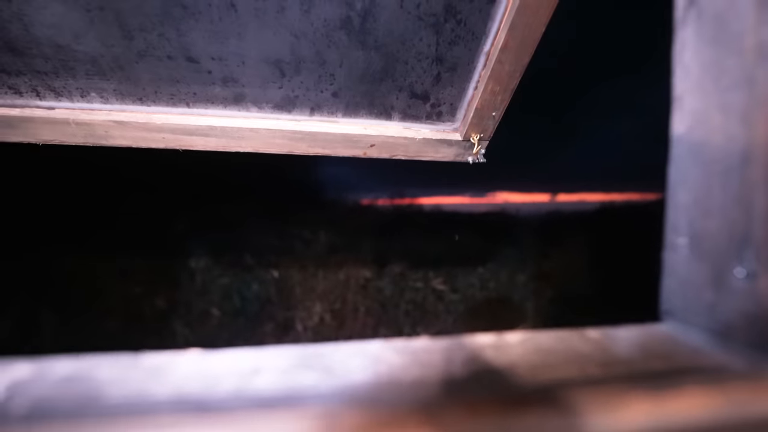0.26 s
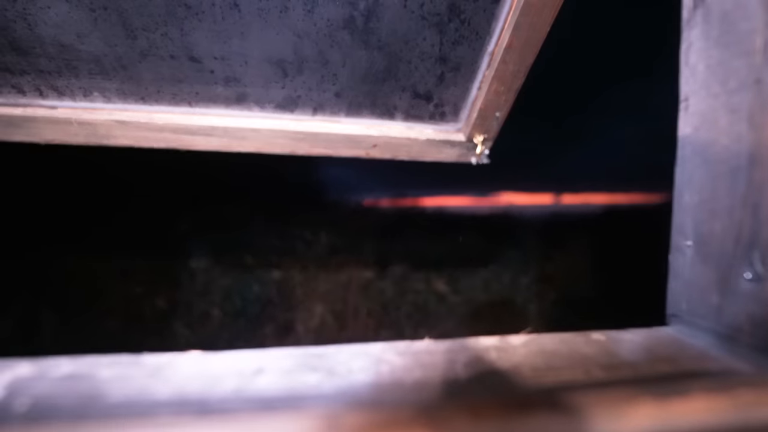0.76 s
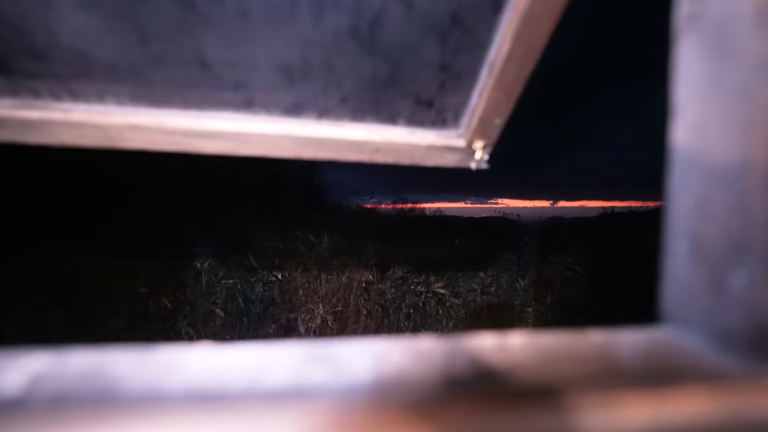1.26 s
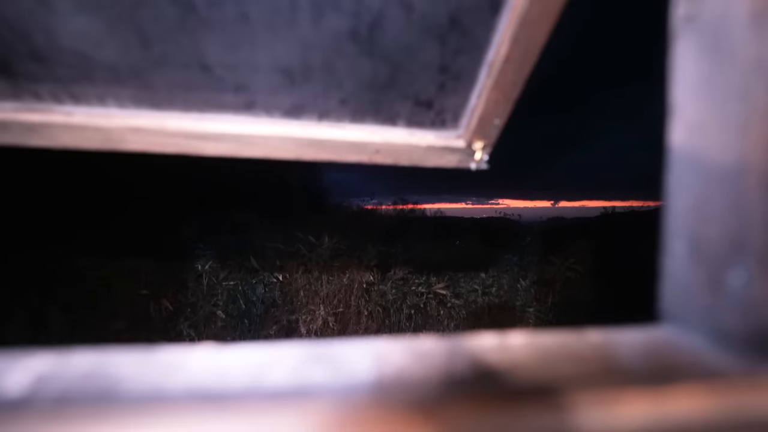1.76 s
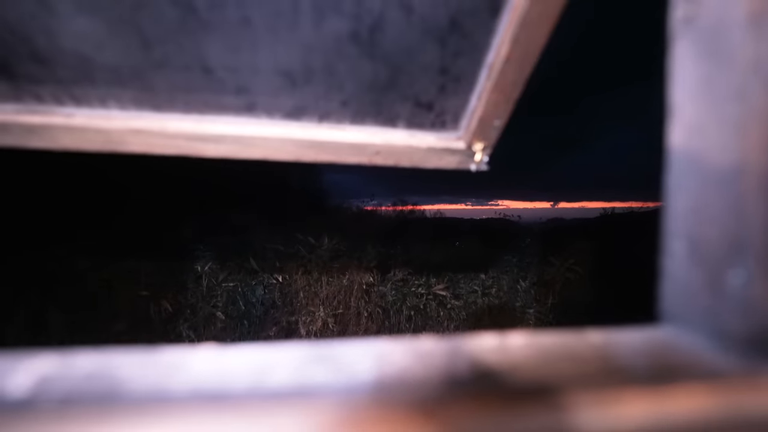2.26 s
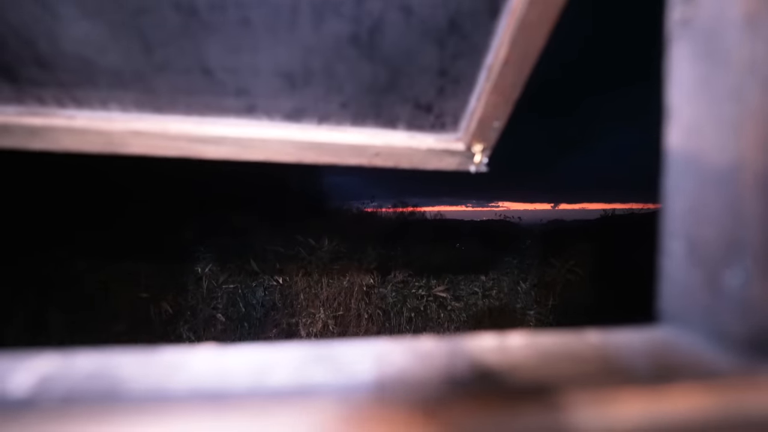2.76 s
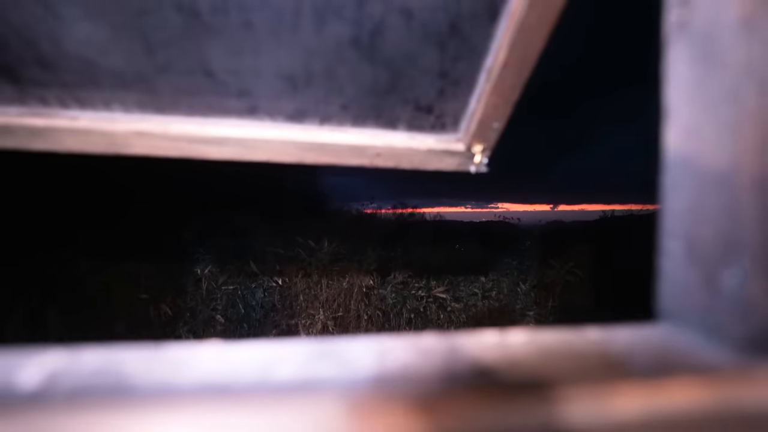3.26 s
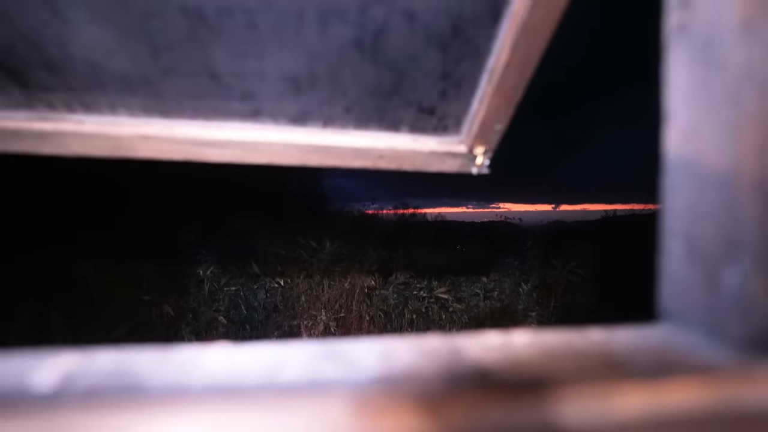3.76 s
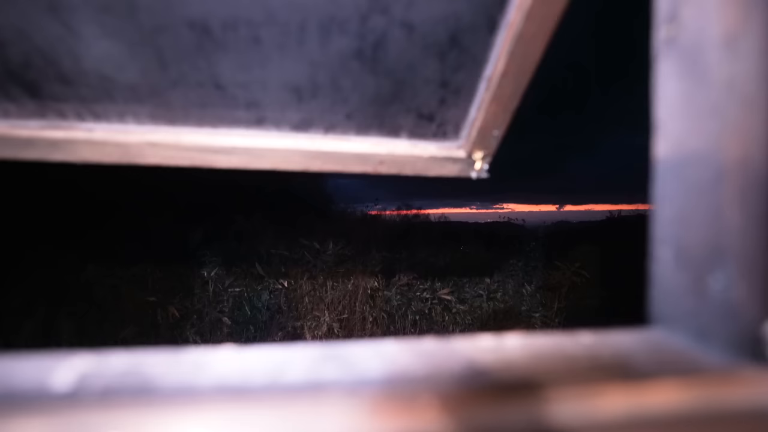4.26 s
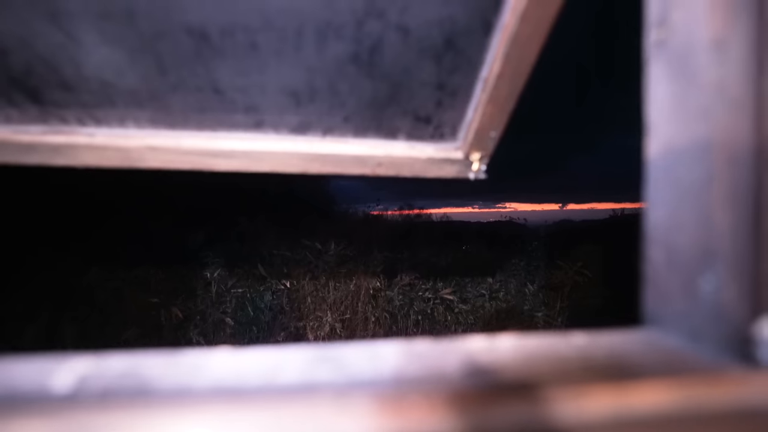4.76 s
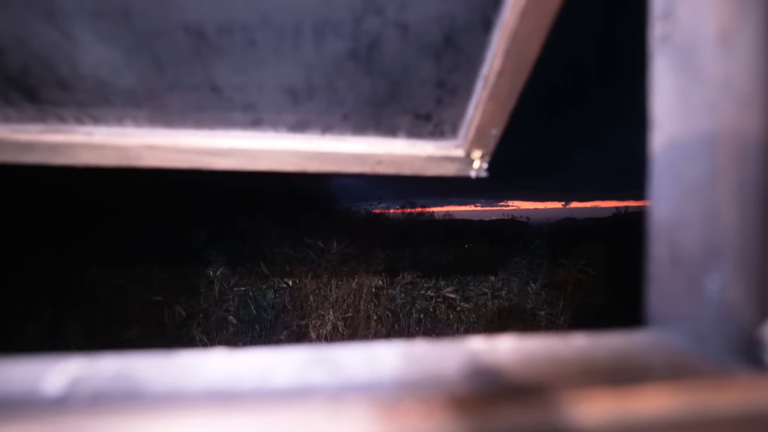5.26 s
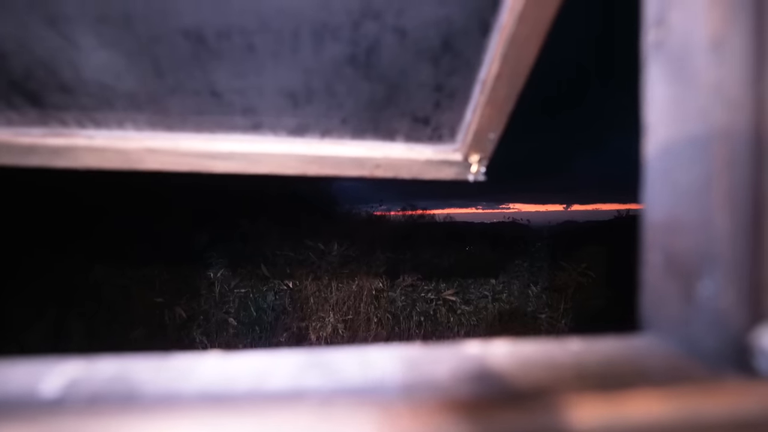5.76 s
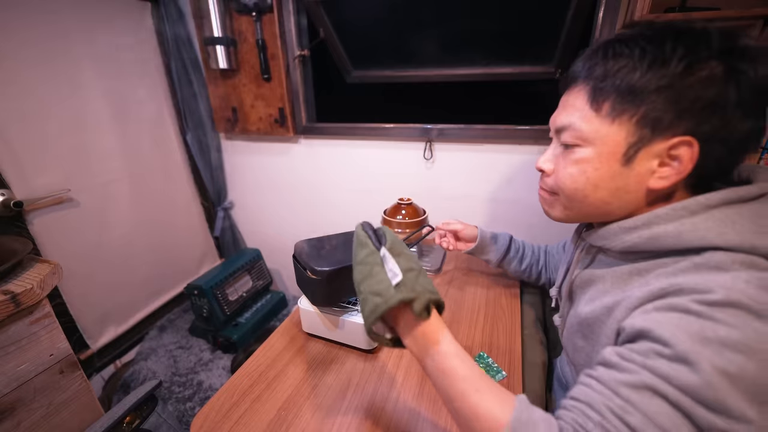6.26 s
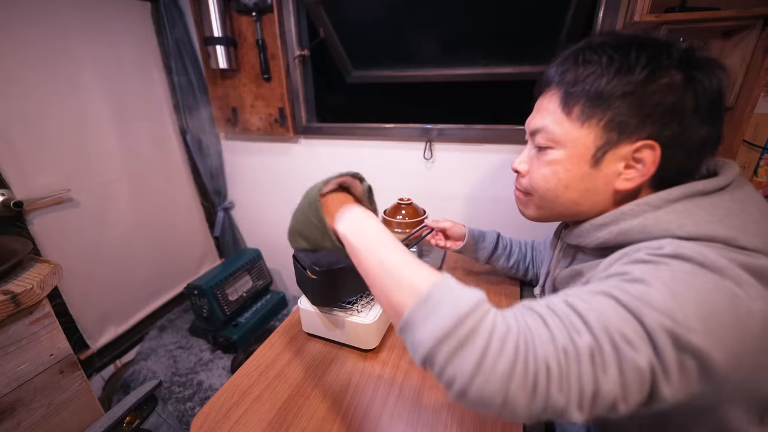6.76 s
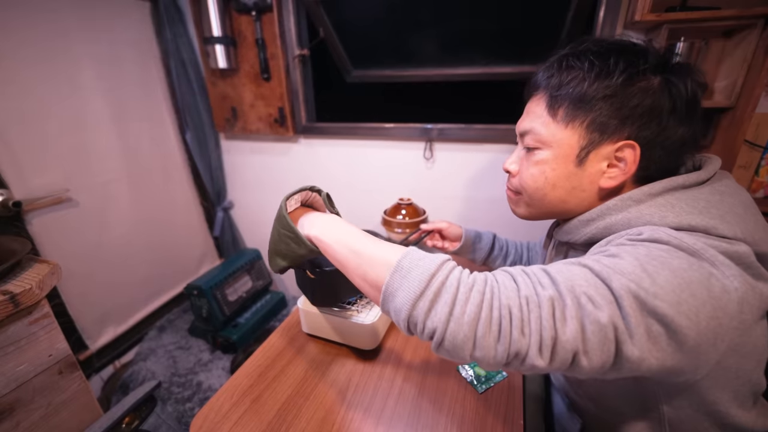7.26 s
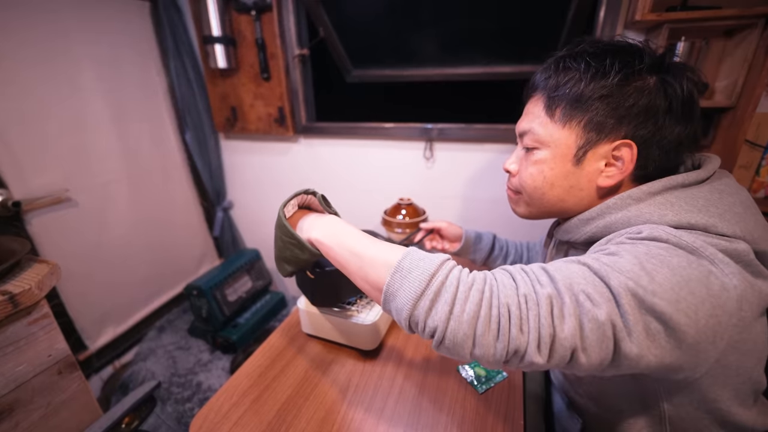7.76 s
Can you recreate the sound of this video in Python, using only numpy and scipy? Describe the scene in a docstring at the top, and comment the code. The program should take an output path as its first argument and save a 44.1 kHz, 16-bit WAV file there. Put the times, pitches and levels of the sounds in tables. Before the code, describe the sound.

A lidded pot bubbles and knocks over a soft gas flame in a small cabin, with low thuds, then suddenly sounds closer and hissier.

```python
"""A lidded pot simmers on a gas burner in a small wooden cabin, heard from the open window, then from the table.
Bubbles are pushes and noisy puffs that ring the pot; steam spits are short bursts of band-passed noise.
The flame roars softly as coloured noise, with resonant gas hiss at the table; the cabin rumbles in low
noise bands and thuds through ringing floor modes. Two mains inverters leak spikes into the microphone."""
import sys
import numpy as np
from scipy import signal
from scipy.fft import rfft, irfft
from scipy.io import wavfile
from scipy.ndimage import uniform_filter1d

SR = 44100
rng = np.random.default_rng(int(sys.argv[2]) if len(sys.argv) > 2 else 0)


def wav_out(sig):
    """Save sig, one row per channel (or a flat mono array), as 16-bit PCM at SR to the path in sys.argv[1]."""
    wavfile.write(sys.argv[1], SR, np.round(np.clip(np.atleast_2d(sig).T, -1, 1) * 32767).astype(np.int16))


def decibels_to_gain(level_db):
    """Convert a level in decibels to a linear amplitude gain (20 dB per decade)."""
    exponent = np.asarray(level_db, float) / 20
    return 10 ** exponent


N = 353682
T = np.arange(N) / SR
MOVE_S = 6.24  # the microphone moves from window to table


def level(x, rms_db):
    """Scale to an rms level."""
    return x * decibels_to_gain(rms_db) / np.sqrt(np.mean(x ** 2))


def coloured(points):
    """Noise with a spectrum drawn through (hz, db) points on a log-frequency axis."""
    hz, db = np.transpose(points)
    bins_hz = np.maximum(np.arange(N // 2 + 1) * SR / N, 1)
    gain = decibels_to_gain(np.interp(np.log(bins_hz), np.log(hz), db))
    return irfft(rfft(rng.standard_normal(N)) * gain, N)


def noise_band(low_hz, high_hz, count=N):
    """White noise through a steep band-pass."""
    sos = signal.butter(3, [low_hz, high_hz], "band", fs=SR, output="sos")
    return signal.sosfilt(sos, rng.standard_normal(count))


def ring(x, hz, t60_s):
    """One decaying mode: a complex one-pole resonator."""
    pole = np.exp(2j * np.pi * hz / SR - np.log(1000) / (t60_s * SR))
    return signal.lfilter([1], [1, -pole], x).imag


def walk(rate_hz):
    """Random values held 1 / rate_hz and smoothed twice over the same time."""
    hold = int(SR / rate_hz)
    steps = np.repeat(rng.standard_normal(N // hold + 1), hold)
    return uniform_filter1d(uniform_filter1d(steps, hold), hold)[:N]


def rise_fall(t, rise_s, fall_s):
    """Exponential rise times exponential fall, not normalised."""
    return np.exp(-t / fall_s) * (1 - np.exp(-t / rise_s))


def puffs(times_s, gains, rise_s, fall_s):
    """Envelope with a unit-peak rise and fall, scaled by its gain, at each time."""
    blows = np.bincount(np.clip(times_s * SR, 0, N - 1).astype(int), gains, N)
    shape = rise_fall(T[:int(0.15 * SR)], rise_s, fall_s)
    return signal.fftconvolve(blows, shape / shape.max())[:N]


def push(times_s, gains, rise_s, fall_s, hz=0):
    """Pushes of unit area times gain, each starting a swing at hz to drive a mode of that pitch."""
    blows = np.bincount((times_s * SR).astype(int), gains, N)
    t = T[:int(0.05 * SR)]
    shape = rise_fall(t, rise_s, fall_s)
    return signal.oaconvolve(blows, shape * np.cos(2 * np.pi * hz * t) / shape.sum())[:N]


def scatter(count, spread_db):
    """Random times and sizes: many small, a few larger, none huge."""
    chance = rng.random((count, 2))
    times_s = chance[:, 0] * N / SR
    return times_s, decibels_to_gain(-spread_db * np.log(1 - 0.93 * chance[:, 1]))


# pot modes at the window: pitch_hz, gain_db, t60_s
POT_WINDOW_MODES = [(315, -1, 0.036), (548.3, 1.5, 0.025), (661.6, -9, 0.045), (915, -14, 0.04),
                    (1161, -3.5, 0.056), (1240, -2.5, 0.026), (1417, -11.5, 0.022), (1607, -9, 0.037),
                    (1737, -15, 0.026), (2270, -16.5, 0.019)]
# pot modes at the table: pitch_hz, gain_db, t60_s
POT_TABLE_MODES = [(211, -9.5, 0.082), (285.4, -2.5, 0.036), (462, -3.5, 0.11), (638, -4.5, 0.062),
                   (1092, -12.5, 0.059), (1438, -6, 0.034), (1780, -7, 0.017), (2420, -6.5, 0.015),
                   (3200, -17, 0.008)]
# big bubbles: start_s, size_db, extra_db (modes below 800 Hz)
BIG_BUBBLES = [(0.0772, -37, 2), (0.1734, -40.5, 8), (0.3257, -37.5, 5), (0.4245, -38, 2),
               (0.7081, -36.5, -2), (1.0324, -37, 1), (1.33, -32.5, 0), (1.387, -41, 2),
               (1.4326, -29.5, -15), (1.502, -42, -3), (1.727, -31, -15), (1.8163, -34, -20),
               (1.8686, -31.5, -4), (1.912, -35, -6), (2.5158, -32, -5), (2.594, -33, 0),
               (3.0964, -30.5, -27), (3.266, -34, -3), (3.5888, -34, -1), (3.695, -41, 3),
               (3.787, -38, -23), (4.5052, -36, -5), (4.749, -30, -5), (5.0163, -30, -7), (5.2036, -33, -2),
               (5.7497, -39, 7), (5.8066, -36, -7), (5.911, -41, -2), (6.067, -34, 1), (6.1924, -34, -3),
               (7.117, -40.5, 9.5), (7.453, -29.5, -10), (7.597, -34, -13), (7.7283, -28, -6),
               (7.872, -46.5, 12)]


def pot(modes, simmer_db, spread_db, rise_s, count):
    """Each bursting bubble briefly pushes the pot wall: small ones a noisy puff, big ones a clean knock."""
    start_s, size_db, extra_db = np.transpose(BIG_BUBBLES)

    def simmer():
        return decibels_to_gain(simmer_db) * puffs(*scatter(count, spread_db), rise_s=0.00068, fall_s=0.0035)

    # deep bubbles thump the low modes, surface bubbles the high ones
    deep, surface = simmer(), simmer()
    out = 0
    for hz, gain_db, t60_s in modes:
        small = (deep if hz < 400 else surface) * rng.standard_normal(N)
        # a quick knock hardly moves the deepest modes
        size = decibels_to_gain(size_db + extra_db * (hz < 800) - 7.3 * (hz < 400))
        clean = 2 * push(start_s, size, rise_s, 2 * rise_s, hz)
        rough = 3.3 * push(start_s, size, rise_s, 2 * rise_s) * rng.standard_normal(N)
        out = out + decibels_to_gain(gain_db) * ring(small + clean + rough, hz, t60_s)
    return out


# steam under the lid: start_s, level_db (rms before the envelope), centre_hz
STEAM_SPITS = [(0.533, -55, 5650), (0.934, -54, 3680), (1.132, -54, 4060), (1.165, -54, 6000),
               (1.592, -55, 5500), (1.782, -55, 4700), (2.055, -56, 4930), (2.338, -54, 6760),
               (2.606, -53, 4900), (3.035, -51, 6600), (3.422, -54, 6600), (3.465, -53, 5340),
               (3.881, -55, 5600), (4.059, -56, 6540), (4.797, -55, 6200), (5.215, -54, 5600),
               (6.132, -52.5, 5900), (7.552, -54, 6860)]


def steam():
    """Steam spits as short band-passed hisses, each with its own centre, over a patter of faint ones."""
    out = np.zeros(N)
    for hz in (2940, 4340, 6000, 7400, 11200):
        patter = puffs(*scatter(count=300, spread_db=3.0), rise_s=0.0035, fall_s=0.0076)
        gain = decibels_to_gain(-71.0 - 4.1 * (hz > 9000))
        out += gain * patter * level(noise_band(hz / 1.46, hz * 1.5), 0)
    # 45 fainter spits before the move: 0..MOVE_S s, -58.5..-59.5 dB, 3820..8000 Hz
    small = rng.random((45, 3)) * [MOVE_S, -1.0, 4180] + [0, -58.5, 3820]
    shape = rise_fall(T[:int(0.06 * SR)], rise_s=0.00052, fall_s=0.009)
    shape /= shape.max()
    for start_s, level_db, hz in [*STEAM_SPITS, *small]:
        i = int(start_s * SR)
        hiss = level(noise_band(hz / 1.23, hz * 1.2, len(shape)), level_db)
        out[i:i + len(shape)] += hiss * shape
    return out


# flame and room air at the window: freq_hz, density_db (relative, per Hz)
ROAR_WINDOW_CURVE = [(120, 8.5), (200, 6), (322, 4), (424, 1), (569, 7), (836, -8.5), (1040, -5), (1160, 1),
                     (2090, -11), (15100, -29.5), (16000, -38)]
# flame and room air at the table: freq_hz, density_db (relative, per Hz)
ROAR_TABLE_CURVE = [(110, -66), (180, -4), (469, 0), (633, -1.5), (750, -11.5), (1470, -6), (2110, -15.5),
                    (2400, -17.5), (5090, -24), (15100, -32), (16000, -40)]


def roar(curve, rms_db):
    """Flame roar and room air: steady noise with a fixed spectrum."""
    return level(coloured(curve), rms_db)


# burner hiss: pitch_hz, level_db (rms before flicker), t60_s
BURNER_JETS = [(4280, -67, .007), (5085, -67, 0.017), (7150, -69.5, .004), (8500, -75, 0.0044)]


def jets():
    """Gas hissing through the burner holes: noise in narrow resonances that flicker independently."""
    out = 0
    for hz, level_db, t60_s in BURNER_JETS:
        hiss = level(ring(rng.standard_normal(N), hz, t60_s), level_db)
        out = out + decibels_to_gain(1.3 * walk(40)) * hiss
    return out


# rumble bands: low_hz, high_hz, window_db, table_db, waver_db (scale of the random walk)
RUMBLE_BANDS = [(8.1, 21.16, -30, -48, 3), (28.3, 44.7, -42, -44.5, 3), (68.4, 123, -58, -52.5, 1),
                (130, 206, -57, -62, 3), (263, 406, -58.5, -53, 3.5)]
# rumble swells: centre_s, half_length_s, centre_hz, level_db (rms before the envelope)
RUMBLE_SWELLS = [(.1, .3, 162, -45), (.3, 0.98, 40.7, -38.5), (0.748, 0.34, 320, -50), (1.0, .8, 88, -48),
                 (1.188, 0.073, 156, -46), (1.924, 0.094, 20.2, -22.5), (3.193, 0.044, 38, -33.5),
                 (6.9, 0.58, 39, -39.5)]
# thuds: start_s, size_db
FLOOR_THUDS = [(1.174, -28), (2.537, -13.5), (2.608, -15.5), (3.888, -28.5)]
# floor modes: pitch_hz, gain_db, t60_s
FLOOR_RINGS = [(40.4, -8, 0.61), (86, 2.5, 0.18), (94.2, -7, 0.35), (140, -38, .1)]


def cabin(near):
    """Low noise bands waver, swell now and then and change at the table; the floor rings when struck."""
    start_s, size_db = np.transpose(FLOOR_THUDS)
    blows = push(start_s, decibels_to_gain(size_db), rise_s=0.0036, fall_s=0.0021)  # soft contact: a long push
    out = sum(decibels_to_gain(gain_db) * ring(blows, hz, t60_s) for hz, gain_db, t60_s in FLOOR_RINGS)
    for low_hz, high_hz, window_db, table_db, waver_db in RUMBLE_BANDS:
        level_db = (1 - near) * window_db + near * table_db + waver_db * walk(3.04)
        out = out + decibels_to_gain(level_db) * level(noise_band(low_hz, high_hz), 0)
    for centre_s, half_s, hz, level_db in RUMBLE_SWELLS:
        swell = np.exp(-((T - centre_s) / half_s) ** 2)
        out = out + swell * level(noise_band(hz / 1.217, hz * 1.206), level_db)
    return out


# spike trains: start_s, end_s, negative_spike_s (time of one), mains_hz
SPIKE_TRAINS = [(0, 3.7, .00835, 60.0771), (3.7, 4.52, 3.7036, 60.0846), (4.52, 6.24, 3.7036, 60.0846),
                (6.24, 8.1, 6.28673, 60.0838), (0, 6.24, .004955, 60.418), (6.24, 8.1, 6.37932, 60.418)]
# one per train: peak_db
SPIKE_PEAKS = [-32.5, -32.5, -28.5, -38, -39, -42]


def inverters():
    """A very short spike of alternating sign every half mains cycle: a windowed sinc, placed between samples."""
    out, taps = np.zeros(N + 64), np.arange(-8, 9)
    for (start_s, end_s, negative_s, mains_hz), peak_db in zip(SPIKE_TRAINS, SPIKE_PEAKS):
        rate_hz = 2 * mains_hz
        k = np.arange(np.ceil((start_s - negative_s) * rate_hz), (min(end_s, N / SR) - negative_s) * rate_hz)
        at = (negative_s + k / rate_hz) * SR
        i = np.round(at).astype(int)[:, None] + taps
        spike = np.sinc(0.85 * (i - at[:, None])) * np.hanning(len(taps))
        np.add.at(out, i, -decibels_to_gain(peak_db) * (-1) ** k[:, None] * spike)
    return out[:N]


def scene():
    """The window view fades into the table view in 42 ms; steam and spikes go straight to the sum."""
    near = np.clip((T - MOVE_S) / 0.042 + 0.5, 0, 1)
    flutter = decibels_to_gain(1.0 * walk(10))  # the flame is never quite steady
    window = flutter * roar(ROAR_WINDOW_CURVE, rms_db=-50)
    window += pot(POT_WINDOW_MODES, simmer_db=-77.5, spread_db=3.6, rise_s=0.00091, count=1400)
    table = flutter * (roar(ROAR_TABLE_CURVE, rms_db=-46.5) + jets())
    table += pot(POT_TABLE_MODES, simmer_db=-74, spread_db=1.9, rise_s=0.00017, count=2200)
    views = (1 - near) * window + near * table
    return (views + steam() + cabin(near) + inverters())[None]


def top_cut(x):
    """A steep low-pass: nothing passes above about 16.5 kHz."""
    return signal.sosfilt(signal.butter(12, 16490, fs=SR, output="sos"), x)


def record(dry):
    """The recorder cuts the top with a steep zero-phase low-pass at 15.8 kHz."""
    sos = signal.ellip(8, 0.1, 50, 15800, fs=SR, output="sos")
    mix = signal.sosfiltfilt(sos, dry)
    return top_cut(mix)


dry = scene()
out = record(dry)
wav_out(out)
```